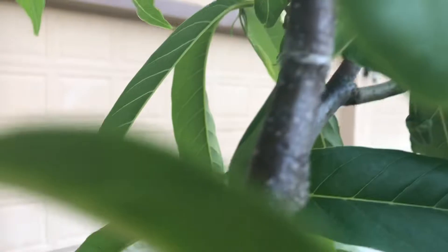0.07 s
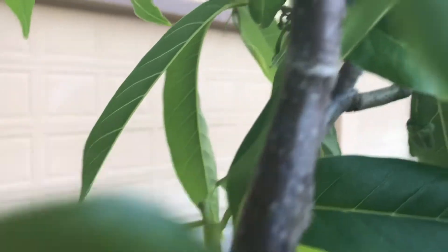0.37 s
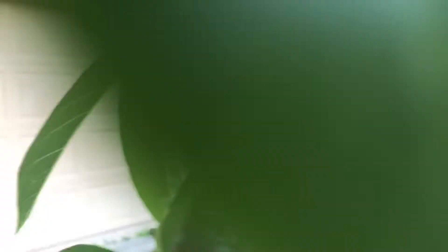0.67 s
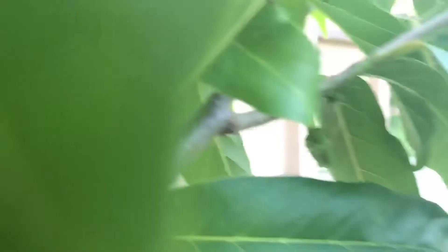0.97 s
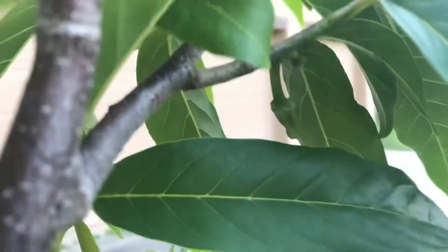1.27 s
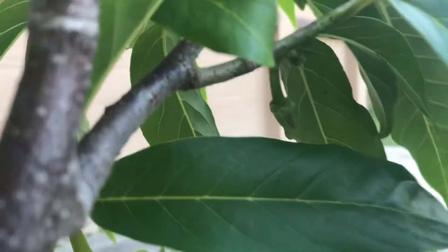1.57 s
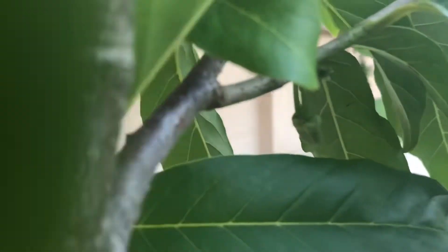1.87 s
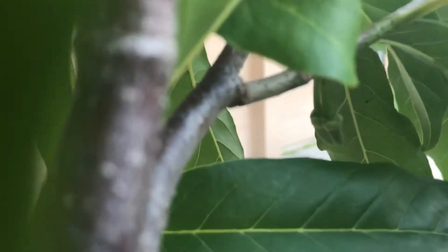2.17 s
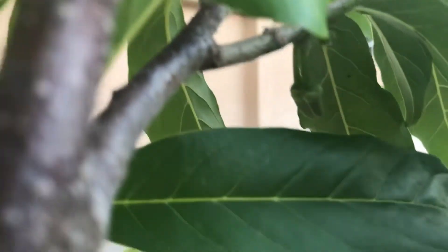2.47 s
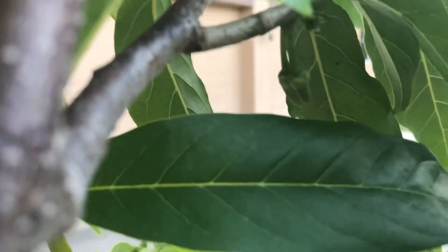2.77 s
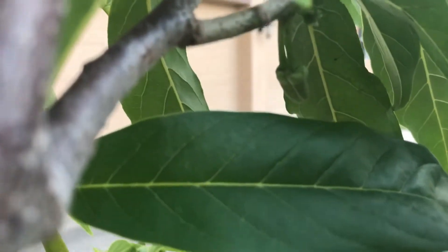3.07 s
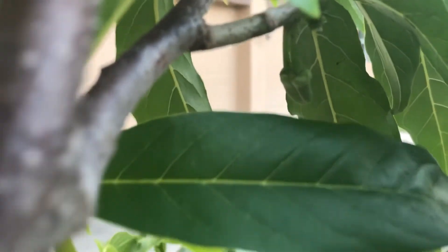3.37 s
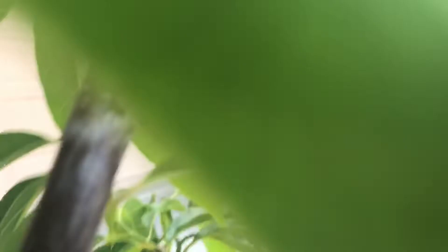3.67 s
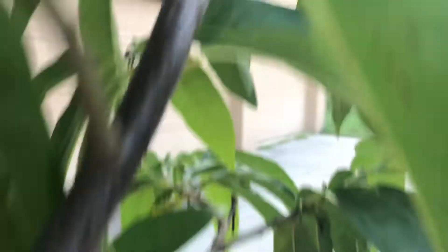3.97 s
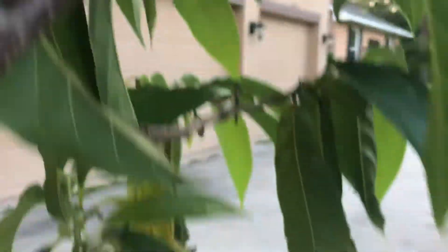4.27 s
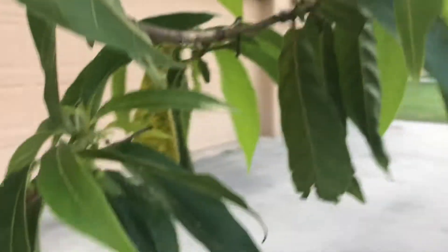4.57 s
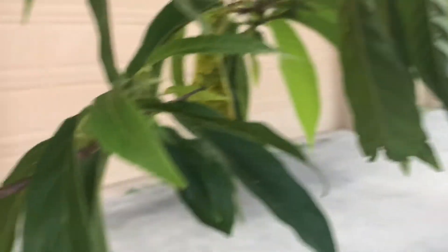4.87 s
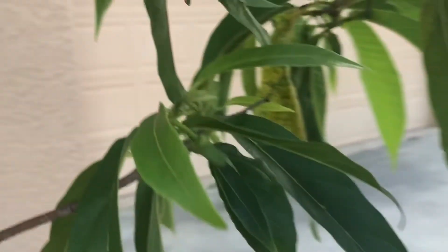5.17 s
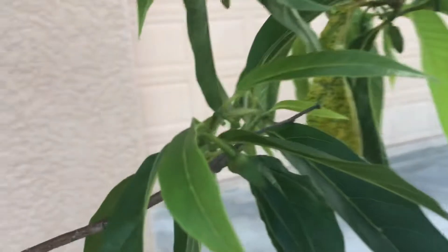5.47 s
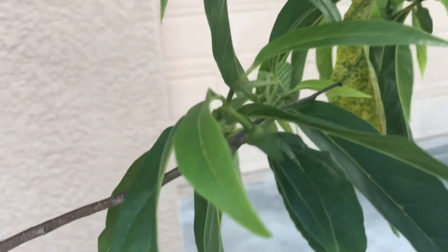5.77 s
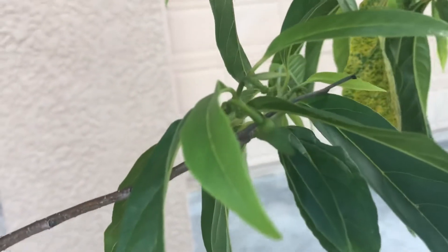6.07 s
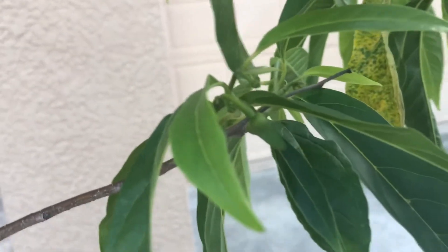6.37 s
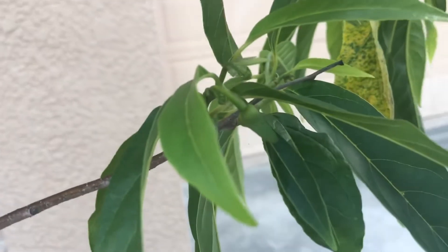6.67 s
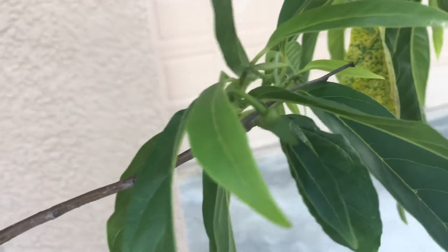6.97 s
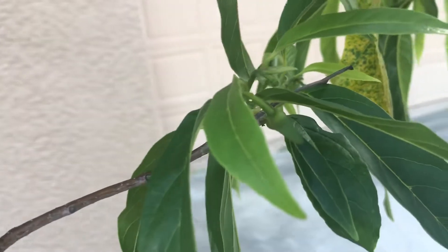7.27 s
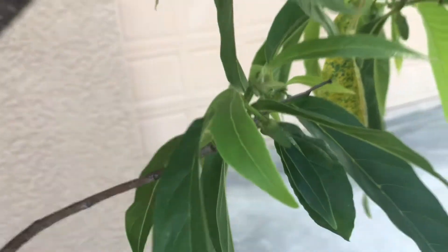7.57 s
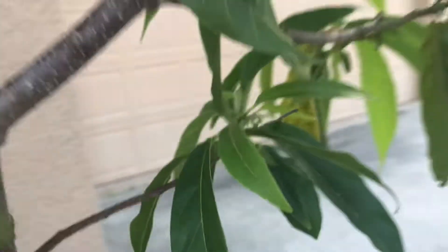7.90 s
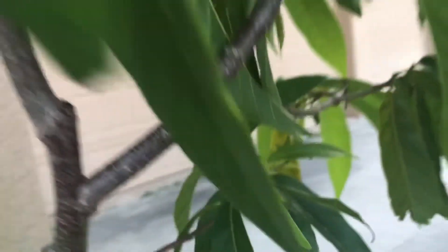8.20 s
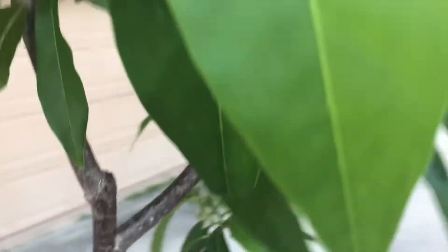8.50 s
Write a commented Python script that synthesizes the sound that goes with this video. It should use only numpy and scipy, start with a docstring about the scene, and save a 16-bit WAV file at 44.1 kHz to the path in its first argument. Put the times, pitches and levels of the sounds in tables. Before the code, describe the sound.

A high, rasping katydid chorus buzzes throughout, its tone shifting slightly as the microphone moves through a tree. Soft outdoor air and a faint air conditioner hum lie underneath, and everything is fairly quiet. From the start to about 2.6 seconds, leaves tick and brush close by, twigs thud on the camera and stems rub with a low grip rumble; the clearest knocks come near 0.7, 1.6 and 2.1 seconds. From 3.2 to 3.7 seconds a branch judders along the case, falling in pitch. A faint, distant cicada whines until about 4 seconds, then fades to a trace, while a thin far rasp comes and goes. Light leaf rustles continue to 5.5 seconds, then the insects are nearly alone. From 7.4 seconds leaves swish and crackle again, with sharp ticks near 7.7, 8 and 8.5 seconds and a little handling rumble.

```python
"""A high, steady katydid buzz, with leaves brushing and ticking and twigs bumping close by.
A handheld camera noses through a tree beside a house; stems judder along its case, the grip rumbles.
Katydids rasp their wings; a far cicada's tymbals whine for the first half, then fade to a trace.
A thin far rasp comes and goes; an air conditioner hums in the outdoor air.
Wall echoes and shading foliage recolour the insects as the camera moves. One microphone."""
import sys
import numpy as np
from scipy import signal
from scipy.fft import rfft, irfft, next_fast_len
from scipy.io import wavfile
from scipy.ndimage import map_coordinates

SR = 44100
rng = np.random.default_rng(int(sys.argv[2]) if len(sys.argv) > 2 else 0)


def waveform_to_disk(signal):
    """Save audio, clipped to [-1, 1], as 16-bit WAV at the path in sys.argv[1]."""
    frames = np.transpose(np.atleast_2d(signal))
    scaled = np.clip(frames, -1, 1) * 32767
    samples = np.round(scaled).astype(np.int16)
    wavfile.write(sys.argv[1], SR, samples)


N = 380891

# near katydids, nearest first: (wing stroke rate [Hz], level [dB])
KATYDID_SINGERS = [(79.2, -2), (84.9, -5), (93.4, -5.5)]


def amp(db):
    """Decibels to gain."""
    return 10 ** (np.asarray(db) / 20)


def unit(x):
    """x at rms 1."""
    return x / np.sqrt(np.mean(x ** 2) + 1e-20)


def curves(rows):
    """One per-sample curve for each column after the time."""
    times, *columns = np.transpose(rows)
    return [np.interp(np.arange(N) / SR, times, column) for column in columns]


def spells(rows, fade_s):
    """Gain fading in and out over each (start [s], end [s], level [dB]) row."""
    t = np.arange(N) / SR
    return sum(amp(db) * np.clip(np.minimum(t - start, end - t) / fade_s, 0, 1)
               for start, end, db in rows)


def wobble(rate_hz):
    """Smooth random curve, rate_hz knots a second."""
    knots = rng.standard_normal(int(N * rate_hz / SR) + 4)
    return map_coordinates(knots, [np.arange(N) * rate_hz / SR])


def filtered(x, response):
    """x through a frequency response."""
    size = next_fast_len(len(x) + SR // 10)
    return irfft(rfft(x, size) * response(np.fft.rfftfreq(size, 1 / SR)), size)[:len(x)]


def coloured(x, points):
    """x shaped by (frequency [Hz], level [dB]) points, at rms 1."""
    f, db = np.transpose(points)
    return unit(filtered(x, lambda hz: amp(np.interp(np.log(hz + 1), np.log(f), db))))


def resonant(x, hz, q):
    """x twice through one resonance."""
    def bandpass(f):
        return 1j * f * hz / q / (hz * hz - f * f + 1j * f * hz / q)
    return filtered(filtered(x, bandpass), bandpass)


def narrow_noise(hz, q):
    """Resonant noise at rms 1."""
    return unit(resonant(rng.standard_normal(N), hz, q))


def ring(hz, width_hz):
    """Noise band around a per-sample pitch, at rms 1."""
    lowpass = signal.butter(2, np.clip(width_hz / 2, 1, SR / 4), fs=SR, output="sos")
    a, b = signal.sosfilt(lowpass, rng.standard_normal((2, len(hz))))
    phase = 2 * np.pi * np.cumsum(hz) / SR
    return unit(a * np.cos(phase) + b * np.sin(phase))


def add(track, start_s, sound):
    """Mix sound into track at start_s."""
    start = round(start_s * SR)
    sound = sound[max(-start, 0):]
    part = track[max(start, 0):][:len(sound)]
    part += sound[:len(part)]


def walls(x, echo_db=-16, nearest_s=.0015, farthest_s=.009, sway_s=0.0001196, count=6):
    """Echoes off house and drive; paths shift as the camera sways, so the comb wanders."""
    out = x.copy()
    for delay_s in np.geomspace(nearest_s, farthest_s, count):
        path_s = delay_s * rng.uniform(.85, 1.15) + sway_s * wobble(.8)
        out += amp(echo_db) * map_coordinates(x, [np.arange(N) - path_s * SR], order=3)
    return unit(out)


def katydids(stroke_depth=0.77, drift=0.0032, far_db=-1, waver_db=1.15, split_hz=9300, shade_hz=11700,
             trunk_s=2.9, trunk_half_width_s=0.47, trunk_db=-13):
    """Each wing stroke rasps a file; far singers blur into a steady hiss."""
    # chorus balance: (time [s], lower band level [dB], upper band re lower [dB])
    balance = [(0.05, -53, -2.5), (0.33, -56.5, -1), (0.43, -58.5, 3.5), (0.95, -57.5, 2.5),
               (1.26, -53.5, -3.5), (1.35, -55.5, -1.5), (1.54, -52.5, -4.5), (2.15, -55.5, 0.5),
               (3.2, -55, -1.5), (3.34, -54, -3), (3.74, -55.5, -1), (3.91, -52.5, -2), (4.17, -56.5, 2),
               (4.57, -53, 1), (4.93, -53.5, -0.5), (5.12, -52.5, 0), (6.25, -54.5, 1.5), (6.7, -53, 1),
               (7.77, -53, 1.5), (8.0, -51.5, 1), (8.24, -55.5, 0), (8.55, -56.5, 0)]
    # wing spectrum: (frequency [Hz], density [dB])
    wing_spectrum = [(6200, -36), (6900, -22), (7400, -15.5), (7850, -8), (8050, -6.5), (8270, -3.5),
                     (8550, -5.5), (9400, -8), (10250, -4), (10700, -6), (11350, -7), (11850, -9.5),
                     (13050, -2), (14600, -6), (15700, -9)]
    chorus_db, upper_db = curves(balance)
    trunk_shadow = np.exp(-((np.arange(N) / SR - trunk_s) / trunk_half_width_s) ** 2)
    top_db = upper_db - 8 + trunk_db * trunk_shadow + 2 * wobble(4)
    rasp = amp(far_db) * rng.standard_normal(N)
    for stroke_hz, db in KATYDID_SINGERS:
        phase = 2 * np.pi * np.cumsum(stroke_hz * (1 + drift * wobble(2.04))) / SR
        pressure = unit(np.exp(stroke_depth * np.cos(phase)))  # scraper bites as the wings close
        rasp += amp(db + waver_db * wobble(8.8)) * pressure * rng.standard_normal(N)
    song = walls(coloured(rasp, wing_spectrum))
    # foliage shades each band differently, the shortest waves most
    upper = filtered(song, lambda hz: 1 / (1 + (split_hz / (hz + 1)) ** 20))
    top = filtered(song, lambda hz: 1 / (1 + (shade_hz / (hz + 1)) ** 20))
    shaded = unit(song - upper) + amp(upper_db + 0.1) * unit(upper - top) + amp(top_db) * unit(top)
    return amp(chorus_db - 2) * shaded


def cicada(click_hz=341, drift=0.00415, floor_db=-8, flutter_db=4, rasp_db=1, whine_db=-5, body_hz=4680):
    """Tymbal clicks chop the abdomen's ring into sidebands that swell in turn, over a dry rasp."""
    # song, stepping up midway, then running down: (time [s], pitch [Hz], level [dB])
    song = [(0, 4854, -74), (2.05, 4845, -72.5), (2.25, 4955, -73), (3.6, 4960, -72.5), (3.9, 4760, -81),
            (4.1, 4740, -80), (4.6, 4730, -84)]
    # sideband swells: (offset, rounded in use [click rates], time [s], half-width [s], level [dB])
    swells = [(-1, .25, .4, 5), (0.96, 0.43, .15, 0), (0, 0.83, 0.15, 10), (-1, 1.1, 0.29, 6),
              (0.89, 1.7, .3, 4), (-1, 1.9, .25, 4), (-2, 2.35, 0.18, 6), (-1, 2.3, 0.17, -1),
              (0, 2.7, .3, 2), (0.95, 2.7, .2, -1), (-2, 3.2, 0.25, 2), (0, 3.65, 0.26, 6)]
    t = np.arange(N) / SR
    pitch_hz, song_db = curves(song)
    whine = np.zeros(N)
    for sideband in sorted({row[0] for row in swells}):
        hz = (pitch_hz + round(sideband) * click_hz) * (1 + drift * wobble(70))
        swell = sum(amp(db) * np.exp(-((t - s) / half_width_s) ** 2)
                    for offset, s, half_width_s, db in swells if offset == sideband)
        flutter = amp(flutter_db * wobble(20))
        whine += (amp(floor_db) + swell) * flutter * np.sin(2 * np.pi * np.cumsum(hz) / SR)
    rasp = walls(narrow_noise(body_hz, q=4.9), echo_db=-4)
    return amp(song_db) * (amp(whine_db) * whine + amp(rasp_db) * rasp)


def outdoor_air(start_db=-56, slope_db_per_s=-0.1575, waver_db=0.16):
    """Low wash of air, slowly fading as the camera moves into the leaves."""
    # air spectrum: (frequency [Hz], density [dB])
    spectrum = [(20, -45), (38, 1.5), (60, 2.5), (170, 0), (260, -6.5), (550, -7.5), (700, -13.5),
                (1150, -13), (2000, -19.5), (3200, -23), (4700, -20.5), (6200, -26), (15700, -22)]
    noise = walls(rng.standard_normal(N), echo_db=-20, nearest_s=.004, farthest_s=.02)
    level_db = start_db + slope_db_per_s * np.arange(N) / SR - waver_db * wobble(5.6)
    return amp(level_db) * coloured(noise, spectrum)


def air_conditioner(drift=0.00205, waver_db=1):
    """Fan and mains hum, slightly unsteady."""
    # hum lines: (frequency [Hz], rms level [dB])
    lines = [(55.4, -65.5), (75, -66.5), (120, -65.5), (166.3, -64), (221.7, -69.5), (277.2, -75),
             (354, -82)]
    out = np.zeros(N)
    for hz, db in lines:
        phase = 2 * np.pi * np.cumsum(hz * (1 + drift * wobble(2.033))) / SR
        out += np.sqrt(2) * amp(db + waver_db * wobble(1.974)) * np.sin(phase)
    return out


def wing_tones(stroke_depth=0.55):
    """Single wing resonances swell out of the chorus, pulsing at the nearest singer's stroke rate."""
    # resonances: (time [s], level [dB], pitch [Hz], half-width [s], bandwidth [Hz])
    tones = [(.1, -63, 8450, .2, 450), (0.851, -60.5, 10150, .2, 500), (1.1, -73, 12830, .6, 130),
             (1.541, -58.5, 8240, .17, 220), (2.198, -65, 9900, .15, 500), (2.7, -71, 8160, .5, 160),
             (2.897, -63, 10200, .35, 200), (3.402, -58.5, 8060, .17, 400), (4.07, -62, 13000, .11, 800),
             (4.45, -63, 13100, .12, 900), (4.549, -57, 8230, .17, 250), (4.902, -67, 12750, .12, 700),
             (5.251, -60, 8290, .4, 220), (5.6, -60.5, 10240, .6, 300), (6.3, -71, 14550, 1.5, 240),
             (6.7, -58, 8040, .15, 250), (7.399, -60.5, 8320, .7, 220), (7.749, -63, 10200, .4, 350)]
    out = np.zeros(N)
    for s, db, hz, half_width_s, width_hz in tones:
        reach = round(2 * half_width_s * SR)
        t = np.arange(-reach, reach) / SR
        swell = amp(db) * np.exp(-(t / half_width_s) ** 2)
        add(out, s + t[0], swell * ring(np.full(len(t), hz), width_hz))
    stroke_phase = 2 * np.pi * KATYDID_SINGERS[0][0] * np.arange(N) / SR
    return out * unit(np.exp(stroke_depth * np.cos(stroke_phase)))


def snaps(edges, q, spread_db=4):
    """A leaf edge lets go: a short crackle through the blade's broad resonance."""
    out = np.zeros(N)
    t = np.arange(SR // 10) / SR
    for s, db, hz, t60_s in edges:
        noise = rng.standard_normal(len(t))
        crackle = noise * amp(spread_db * rng.standard_normal(len(t)) - 60 * t / t60_s)
        blade = resonant(crackle, hz, q)
        add(out, s, amp(db) * blade / np.abs(blade).max())
    return out


def rubs(strokes, q, grain_db, catch_db, gain_db=0):
    """Friction catches and slips in uneven grains, swelling and fading through a broad resonance."""
    out = np.zeros(N)
    t = np.arange(-SR // 4, SR // 4) / SR
    catching = amp(catch_db * np.clip(wobble(170), -2, 2))
    for s, db, hz, length_s in strokes:
        swell = np.exp(-2 * (t / length_s) ** 2)
        noise = rng.standard_normal(len(t))
        slips = noise * amp(grain_db * np.clip(rng.standard_normal(len(t)), -2, 2))
        rub = swell * resonant(slips, hz, q)
        add(out, s + t[0], amp(db + gain_db) * rub * np.linalg.norm(swell) / np.linalg.norm(rub))
    return out * unit(catching)


def leaves(crinkles_per_s=90, crinkle_db=5, scatter_db=3, scatter_octaves=0.5, crinkle_t60_s=0.028):
    """Leaves rub past, shedding small random snaps; some edges snap loudly."""
    # sliding leaves: (peak time [s], level [dB], centre [Hz], length [s])
    swishes = [(0.319, -62, 3800, 0.042), (0.642, -61, 4000, 0.031), (0.789, -63.5, 1900, 0.12),
               (2.096, -55.5, 1300, 0.034), (2.244, -57, 1090, 0.028), (2.429, -62, 740, 0.046),
               (3.76, -67, 2000, 0.13), (4.038, -62, 1530, 0.17), (4.841, -67, 2200, .19),
               (5.2, -65, 2500, .14), (5.49, -66.5, 3500, .04), (7.379, -61, 2734, 0.045),
               (7.658, -59, 5000, 0.067), (7.76, -58, 2000, 0.17), (8.042, -61, 1670, 0.095),
               (8.385, -62, 1600, .05), (8.433, -54.5, 2280, 0.025)]
    # loudest edges snapping free: (time [s], peak [dB], pitch [Hz], t60 [s])
    edges = [(.144, -40, 4500, 0.035), (.276, -48, 4400, .02), (.292, -48, 4400, .02),
             (.314, -47, 3200, 0.027), (.634, -49, 3940, .02), (.814, -49, 1600, .015),
             (1.21, -45.5, 1660, 0.018), (1.611, -37.5, 1600, 0.014), (1.765, -49, 3500, .015),
             (1.833, -46.5, 1000, 0.014), (2.08, -39.5, 4500, 0.024), (2.104, -44, 4900, .035),
             (2.234, -43, 3600, 0.02), (2.242, -39, 4600, .019), (2.402, -46.5, 1050, 0.029),
             (3.489, -48, 1600, .015), (3.7, -51, 2800, .015), (3.795, -50, 2170, 0.017),
             (3.993, -46, 1595, 0.046), (4.025, -53, 2000, .03), (4.056, -47, 3600, .025),
             (4.63, -51, 2100, .022), (4.794, -51, 2500, .018), (5.185, -51, 3500, .02),
             (5.219, -52, 2800, .02), (5.283, -51, 2600, .02), (7.37, -51, 2290, .02),
             (7.591, -48.5, 2000, 0.032), (7.634, -49, 4620, .03), (7.703, -48.5, 2200, .045),
             (7.729, -35, 1448, 0.016), (7.803, -53, 3640, 0.056), (7.841, -47, 2910, .06),
             (7.911, -46, 1800, 0.021), (7.978, -43, 1910, 0.043), (8.033, -37.5, 3000, 0.022),
             (8.421, -46, 1700, .025), (8.433, -46, 3180, .03), (8.473, -34, 14360, .02),
             (8.485, -44, 2370, .03)]
    rub = rubs(swishes, q=0.38, grain_db=4, catch_db=2.5, gain_db=-1)
    crinkles = []
    for s, db, hz, length_s in swishes:
        count = round(length_s * crinkles_per_s)
        for when, force, pitch in rng.standard_normal((40, 3))[:count]:
            onset_s = s + np.tanh(when) * length_s * .8
            peak_db = db + crinkle_db + scatter_db * np.tanh(force)
            crinkles.append((onset_s, peak_db, hz * 2 ** (scatter_octaves * pitch), crinkle_t60_s))
    return rub + snaps(edges, q=0.92) + snaps(crinkles, q=1.3)


def twigs(thud_ratio=0.463, thud_db=-9, attack_cycles=0.5, sag_cycles=2, roughness=0.29):
    """A twig knocks, its pitch sinking as it lets go; the whole case thuds lower."""
    # knocks on the case: (time [s], peak [dB], mid-fall pitch [Hz], t60 [s], pitch fall [octaves])
    knocks = [(.151, -42.5, 606, 0.02, .15), (.486, -41, 105, .05, 0.98), (0.536, -41, 144, 0.068, .9),
              (.611, -43, 150, .05, 0.8), (0.696, -32.5, 169, 0.054, 1.63), (.741, -41, 387, 0.025, .15),
              (1.089, -36.5, 286, 0.021, 0.44), (1.613, -33.5, 490, 0.047, 0.09),
              (1.622, -40, 172, 0.046, 0.79), (1.645, -37, 288, 0.033, .5), (2.061, -35.5, 390, 0.025, .5),
              (3.465, -45.5, 530, 0.05, .1), (7.7295, -35.5, 960, 0.0085, .15),
              (8.484, -46, 2460, 0.073, 0.14), (8.624, -41, 367, .035, .15)]
    thuds = [(s, db + thud_db, hz * thud_ratio, t60_s, fall) for s, db, hz, t60_s, fall in knocks]
    out = np.zeros(N)
    t = np.arange(SR // 8) / SR
    for s, db, hz, t60_s, fall in knocks + thuds:
        pitch_hz = hz * 2 ** (fall * (np.exp(-t * hz / sag_cycles) - .5))
        tone = np.sin(2 * np.pi * np.cumsum(pitch_hz) / SR)
        scuff = unit(resonant(rng.standard_normal(len(t)), hz, q=1))
        rise = 1 - np.exp(-(t * hz / attack_cycles) ** 2)
        blow = rise * amp(-60 * t / t60_s) * (tone + roughness * scuff)
        add(out, s, amp(db) * blow / np.abs(blow).max())
    return out


def handling(hz=82, q=0.71, lump_db=4, lumps_per_s=14):
    """The hand shifts on the case in soft, uneven lumps of rumble."""
    # grip shifts, pushing in and pulling out: (start [s], end [s], level [dB])
    shifts = [(.2, 1.92, -59), (8.05, 8.6, -61)]
    lumps = amp(lump_db * np.clip(wobble(lumps_per_s), -2, 2))
    return spells(shifts, fade_s=0.07) * unit(lumps * narrow_noise(hz, q))


def stems(case_hz=348, scuff_db=-7, scuff_db_per_octave=3.5, scuff_stretch=1.3, scuff_lag=.4):
    """Stems judder along the case; a scuff of its resonance trails, louder for a faster judder."""
    # stem drags: (peak time [s], level [dB], pitch [Hz], length [s])
    drags = [(.5, -50.5, 62, 0.062), (.55, -54, 139, .05), (.955, -50, 90, .025), (1.238, -52.5, 106, .03),
             (1.427, -53, 54.7, 0.049), (1.682, -52.5, 88, .05), (1.853, -51, 179, 0.041),
             (2.094, -44.5, 143, 0.045), (2.159, -60, 395, 0.11), (2.248, -45, 158, 0.045),
             (2.402, -45.5, 154, 0.027), (2.557, -49, 260, 0.031), (3.082, -47, 152, 0.02),
             (7.149, -51.5, 75.5, 0.062), (8.424, -50, 63.9, 0.031), (8.541, -49, 69, 0.019)]
    scuffs = []
    for s, db, hz, length_s in drags:
        level_db = db + scuff_db + scuff_db_per_octave * np.log2(hz / case_hz)
        scuffs.append((s + scuff_lag * length_s, level_db, case_hz, length_s * scuff_stretch))
    rumble = rubs(drags, q=2.2, grain_db=5, catch_db=2, gain_db=0.5)
    return rumble + rubs(scuffs, q=1.2, grain_db=1, catch_db=2.5)


def far_rasp(hz=5800, q=4):
    """A thin dry rasp, probably another insect, just under the katydids' band."""
    # rasp spells: (start [s], end [s], level [dB])
    calls = [(2.15, 3.75, -76), (4.7, 7.7, -76.5)]
    return spells(calls, fade_s=0.11) * narrow_noise(hz, q)


def branch_slide(jitter=0.0945, catch_db=2, scuff_db=-4, width_share=0.94, scuff_ratio=1.25):
    """A branch judders along the case in unbroken contact; the pitch rises briefly, then falls."""
    # one long slide: (time [s], level [dB], judder rate [Hz])
    slide = [(3.17, -60, 210), (3.255, -58, 288.4), (3.295, -48.5, 282), (3.33, -47.5, 256),
             (3.39, -62, 220.5), (3.43, -50.5, 195.6), (3.51, -62, 169), (3.55, -51, 147.9),
             (3.59, -51, 141.2), (3.68, -64, 138)]
    db, hz = curves(slide)
    judder_hz = hz * (1 + jitter * wobble(90))
    judder = unit(np.sin(2 * np.pi * np.cumsum(judder_hz) / SR))
    scuff = ring(scuff_ratio * hz, width_share * hz.mean())
    contact = spells([(slide[0][0], slide[-1][0], 0)], fade_s=.02)
    return contact * amp(db + catch_db * wobble(70)) * (judder + amp(scuff_db) * scuff)


def scene():
    """One microphone, the same in both channels."""
    insects = katydids() + wing_tones() + cicada() + far_rasp()
    background = outdoor_air() + air_conditioner()
    contacts = stems() + branch_slide() + twigs() + handling() + leaves()
    mono = insects + background + contacts
    return np.array([mono, mono])


def record(dry, low_hz=40, top_hz=15720):
    """The camera cuts deep rumble and everything above its band limit."""
    highpass = signal.butter(4, low_hz, "highpass", fs=SR, output="sos")
    cut = signal.sosfilt(highpass, dry)
    return np.array([filtered(channel, lambda hz: hz < top_hz) for channel in cut])


dry = scene()
out = record(dry)
waveform_to_disk(out)
```